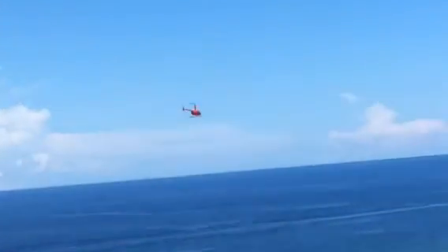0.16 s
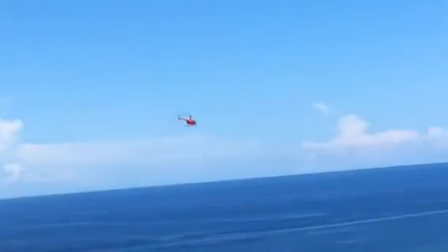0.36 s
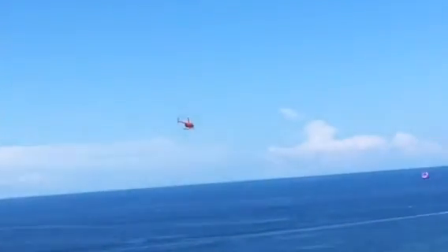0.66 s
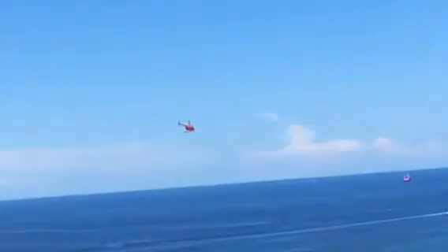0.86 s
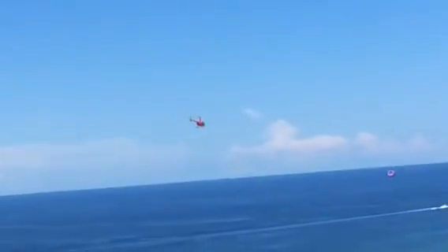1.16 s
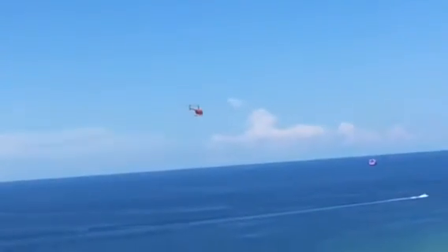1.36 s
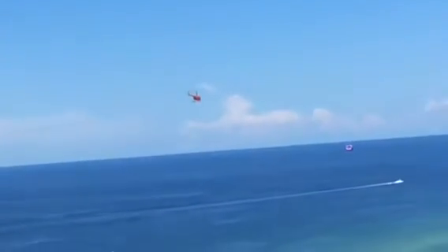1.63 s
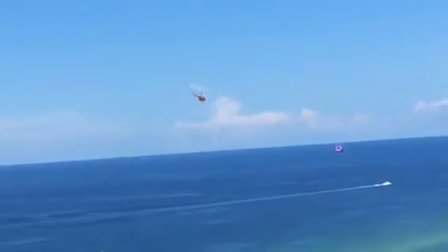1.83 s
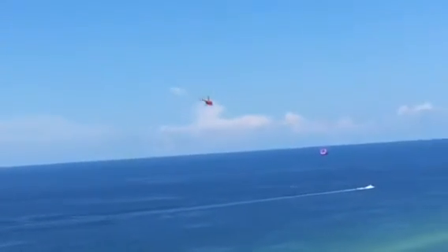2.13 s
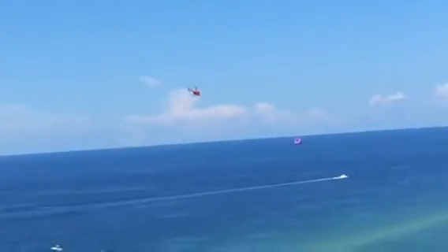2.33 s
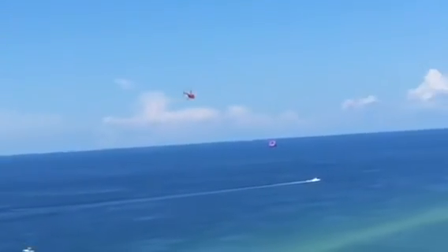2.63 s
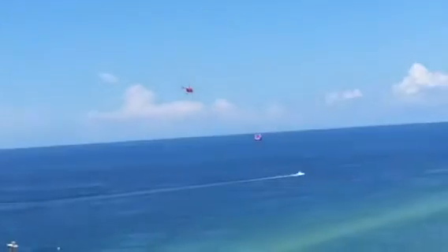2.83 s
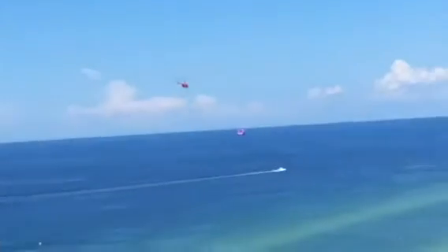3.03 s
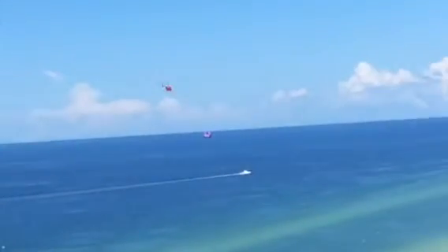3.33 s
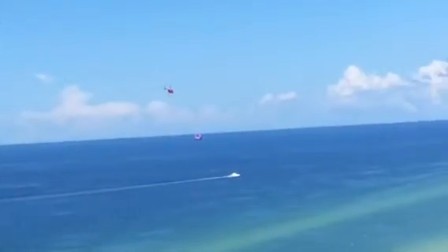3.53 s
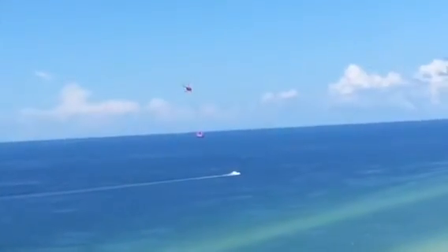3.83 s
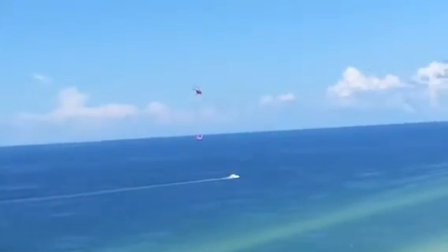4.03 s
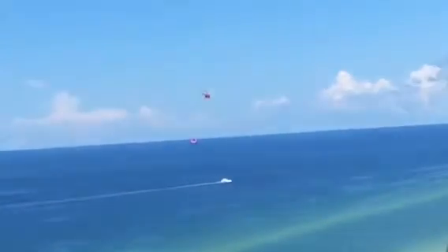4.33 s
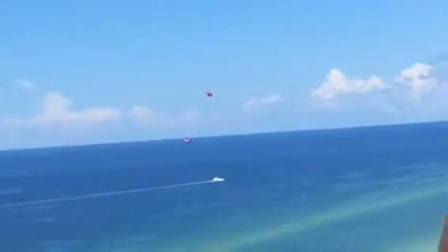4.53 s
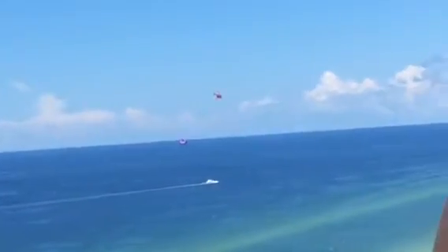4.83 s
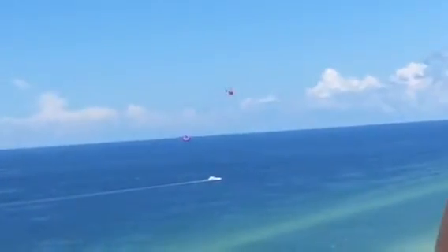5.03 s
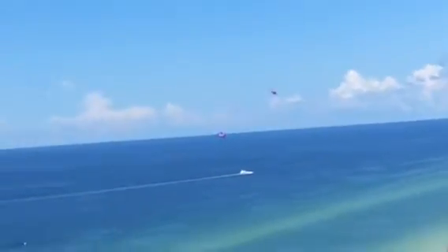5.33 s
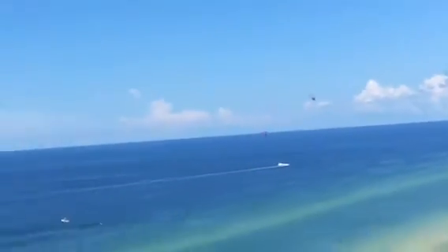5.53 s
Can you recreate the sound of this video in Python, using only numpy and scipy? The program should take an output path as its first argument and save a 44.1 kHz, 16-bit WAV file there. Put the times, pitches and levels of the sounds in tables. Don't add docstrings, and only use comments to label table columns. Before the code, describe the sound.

A distant piston helicopter drones steadily over the sea, slowly wavering and fading, with faint surf hiss and small handling ticks close by.

```python
import sys
import numpy as np
from scipy import signal
from scipy.fft import rfft, irfft, next_fast_len
from scipy.io import wavfile
from scipy.ndimage import uniform_filter1d, map_coordinates

SR = 44100
rng = np.random.default_rng(int(sys.argv[2]) if len(sys.argv) > 2 else 0)


def boost_factor(decibels):
    exponent = np.asarray(decibels, float) / 20
    return 10 ** exponent


def generate_wav(signal):
    frames = np.transpose(np.atleast_2d(signal))
    scaled = np.clip(frames, -1, 1) * 32767
    pcm = np.round(scaled).astype(np.int16)
    wavfile.write(sys.argv[1], SR, pcm)


N = 250480

# (time [s], firing rate as heard [Hz], lag of the sea path [firing periods])
FLIGHT_PATH = [(0, 123.3, 9.12), (.84, 122.87, 8.5), (1.56, 122.5, 8), (2.3, 122.15, 7.5),
               (2.96, 121.85, 7), (3.67, 121.5, 6.5), (4.42, 121.2, 6), (5.31, 120.85, 5.5),
               (5.68, 120.7, 5.32)]
# (time [s], level [dB])
AIR_CLEARNESS = [(0, 0), (.4, 0.1), (.7, 1.5), (1, -0.5), (1.3, 0.5), (1.6, 0), (1.95, 2), (2.3, 0.1),
                 (2.65, 0.7), (3, -0.5), (3.35, 0), (3.75, -2), (4.1, 0.5), (4.5, -0.2), (4.9, 0),
                 (5.3, 0.5), (5.68, 1.5)]
# (time [s], level [dB])
FIRING_SWING = [(0, -32.5), (.9, -31), (1.6, -32.5), (2.6, -33), (3.3, -36.5), (4.1, -38.5), (4.8, -37.5),
                (5.3, -34.5)]
# (time [s], level [dB])
WAVE_WASH = [(0, -61), (.5, -60), (1.3, -61.5), (1.6, -62.5), (2.4, -64.5), (3.35, -65.5), (3.75, -67.5),
             (4.5, -64), (5.25, -62.5), (5.68, -64)]

LOW_ORDERS = (3, 9, 10, 11, 13, 14, 15, 16, 17, 18, 19, 20)
HIGH_ORDERS = (21, 23, 24, 25, 26, 27, 28, 29, 30, 32, 34, 40)
# (level [dB], sea path re straight path [dB], extra lag of its source [firing periods])
LOW_ORDER_LEVELS = [(-13, -4.5, -0.43), (-12, -0.5, 0.023), (-12, -4.5, .07), (-17, 3.5, 0), (-17, -7, 0),
                    (-9, 0, 0.017), (-8.5, -5, 0.074), (-20.5, -1, .07), (-16.5, -14, .07),
                    (-10.5, -2.5, 0.081), (-13, -1, 0.07), (-10.5, -1, 0.091)]
# (level [dB], sea path re straight path [dB])
HIGH_ORDER_LEVELS = [(-40, -5), (-23, -16), (-22, -5), (-20, -17), (-19, -19), (-19.5, -5.5), (-20.5, -5),
                     (-14, -4.5), (-23, -15), (-17.5, -5), (-19, -11.5), (-24.5, 2)]
BLADE_HARMONICS = (4, 5, 6, 7, 8, 9, 12)
BLADE_LEVELS = [-22.5, -32, -13, -21.5, -15.5, -14, -21.5]

# (frequency [Hz], level [dB])
DOWNWASH_SPECTRUM = [(15, -49), (30, -7), (50, -9), (62, 8), (100, 3.5), (140, 5), (190, 6.5), (260, -50)]
ROAR_SPECTRUM = [(120, -20), (180, -2.5), (250, -0.5), (420, -0.5), (520, -3), (680, -2.5), (820, -7.5),
                 (1150, -7), (1550, -12), (2200, -15.5), (2700, -30), (3800, -53)]
SURF_SPECTRUM = [(1800, -18), (2600, 3.5), (3200, 1), (4000, 0), (5200, -1.5), (6300, -6), (7200, -11),
                 (8050, -9.5), (8400, -55)]
SPRAY_SPECTRUM = [(7700, -62), (8100, 2.5), (8700, 0.5), (9400, 0.5), (10200, -4), (12000, -7.5),
                  (13300, -18), (14200, -27), (15200, -18)]
# (centre [Hz], width [Hz], level [dB])
TAILPIPE_MODES = [(1892, 254, 5), (2115, 300, 4)]

# (time [s], length [s], centre [Hz], width [Hz], level [dB])
RUSTLES = [
    (0.29, 0.14, 5500, 1600, -62.5),
    (0.614, .05, 5100, 870, -61),
    (0.76, 0.15, 900, 170, -48.5),
    (1.94, 0.17, 5000, 900, -67),
    (1.7, 0.34, 816, 28, -54.5),
    (2.5, 0.33, 1160, 180, -56),
    (3.7, .1, 1370, 110, -62),
    (5.56, .06, 4000, 700, -62),
    (5.56, .06, 5100, 700, -68),
    (5.55, 0.038, 1960, 410, -55.5),
]
# (time [s], peak level [dB], knock re snap [dB])
TICKS = [
    (.340, -55, -9),
    (.686, -51, -9),
    (1.41, -52, -12),
    (3.5697, -51, -20),
    (5.1891, -41, 3),
    (5.204, -64, 21),
    (5.631, -56, -9),
]
# (frequency [Hz], level [dB])
SNAP_SPECTRUM = [(5000, -20), (8000, -5), (9500, 0), (11000, -4), (14500, -2), (15400, -40)]
KNOCK_SPECTRUM = [(300, -20), (800, -3), (2200, 0), (4500, -4), (8000, -14), (12000, -40)]

# (level at the start [dB], drift [dB/s])
OCTAVE, LOW, HIGH, ROTOR = (-45.5, -0.54), (-43.5, -0.7), (-39.5, -1.8), (-42, -0.99)
EXHAUST, RASP = (-43.5, -0.87), (-50, -1.7)
AIR_ON_ROAR, AIR_ON_RASP, AIR_ON_HIGH = 0.8, 2.05, 0.39
OCTAVE_FOLLOWS = 0.42
HIGH_LAG = 0.037
MIRROR_LAG, FIRING_LOSS_DB, OCTAVE_LOSS_DB = 7.3, 1.3, 3.5
WALL_S, WALL_BASS_S, WALL_EDGE_S = 5.44, 5.56, 0.02
WALL_FIRING_DB, WALL_LOW_DB, WALL_ROTOR_DB = -27, -2, -10
SPRAY_DB, SPRAY_FOLLOWS, SPRAY_RISE_DB_S = -71.5, 0.8, 0.5


def unit(x):
    return x / np.sqrt(np.mean(x ** 2) + 1e-20)


def curves(rows):
    s, *columns = np.transpose(rows)
    return [np.interp(np.arange(N) / SR, s, column) for column in columns]


def wobble(rate):
    knots = rng.standard_normal(int(N * rate / SR) + 4)
    return map_coordinates(knots, [np.arange(N) * rate / SR])


def filtered(x, response):
    m = next_fast_len(N + SR // 2)
    return irfft(rfft(x, m) * response(np.fft.rfftfreq(m, 1 / SR)), m)[:N]


def shape(points):
    f, db = np.transpose(points)
    return lambda hz: boost_factor(np.interp(np.log(hz + 1), np.log(f + 1), db))


def patchy(depth_db):
    z = signal.stft(rng.standard_normal(N + 512), nperseg=512)[2]
    field = uniform_filter1d(rng.standard_normal(z.shape), size=6, axis=0)
    field = uniform_filter1d(field, size=14, axis=1)
    return signal.istft(z * boost_factor(depth_db * unit(field)), nperseg=512)[1][:N]


def two_paths(cycle, lag, order, sea_db, flutter_db, drift):
    start = rng.uniform(0, 2 * np.pi)

    def path(turns):
        level = boost_factor(flutter_db * wobble(5))
        return level * np.sin(2 * np.pi * order * turns + start + drift * wobble(6))

    return path(cycle) + boost_factor(sea_db) * path(cycle - lag / 6)


def firing_tones(cycle, lag, firing_db, octave_db):
    steep = np.maximum(lag - MIRROR_LAG, 0)
    firing_sea_db = 0.5 - FIRING_LOSS_DB * steep
    octave_sea_db = -1 - OCTAVE_LOSS_DB * steep
    firing = two_paths(cycle, lag, 6, firing_sea_db, flutter_db=0.25, drift=0.03)
    octave = two_paths(cycle, lag, 12, octave_sea_db, flutter_db=0.6, drift=0.1)
    return np.sqrt(2) * (boost_factor(firing_db) * firing + boost_factor(octave_db) * octave)


def uneven_cylinders(cycle, lag, low_db, high_db):
    def stack(orders, levels):
        total = np.zeros(N)
        for order, (db, sea_db, extra) in zip(orders, levels):
            total += boost_factor(db) * two_paths(cycle, lag + extra, order, sea_db, flutter_db=1.1, drift=0.12)
        return total

    low = stack(LOW_ORDERS, LOW_ORDER_LEVELS)
    high = stack(HIGH_ORDERS, [(*row, HIGH_LAG) for row in HIGH_ORDER_LEVELS])
    return np.sqrt(2) * (boost_factor(low_db) * low + boost_factor(high_db) * high)


def main_rotor(cycle, lag, rotor_db):
    geared = 3 / 5
    thump = np.zeros(N)
    for k, db in zip(BLADE_HARMONICS, BLADE_LEVELS):
        thump += boost_factor(db) * two_paths(cycle, lag, k * geared, sea_db=-7.5, flutter_db=1.5, drift=0.3)
    downwash = unit(filtered(rng.standard_normal(N), shape(DOWNWASH_SPECTRUM)))
    return np.sqrt(2) * boost_factor(rotor_db) * thump + boost_factor(rotor_db - 4.5) * downwash


def exhaust(cycle, roar_db, rasp_db):
    def beat(order):
        return np.cos(2 * np.pi * order * cycle)

    def pipe(f):
        return sum(boost_factor(db) * 1j * f * w / (c * c - f * f + 1j * f * w) for c, w, db in TAILPIPE_MODES)

    puffs = boost_factor(0.43 * beat(2) + 0.3 * beat(3) + 0.43 * beat(1))
    roar = unit(filtered(puffs * patchy(0.88), shape(ROAR_SPECTRUM)))
    bank = boost_factor(0.6 * beat(3) + 0.8 * beat(2) + 2.5 * beat(6) + 1.3 * wobble(12))
    rasp = unit(filtered(bank * patchy(1.6), lambda f: pipe(f) ** 2))
    return boost_factor(roar_db + 0.5) * roar + boost_factor(rasp_db - 1.1) * rasp


def shore(surf_db, spray_db):
    breeze_db = 0.5 * wobble(11) + 0.41 * wobble(40)
    surf = unit(filtered(patchy(0.99), shape(SURF_SPECTRUM)))
    spray = unit(filtered(patchy(0.7), shape(SPRAY_SPECTRUM)))
    return boost_factor(breeze_db) * (boost_factor(surf_db + 3.0) * surf + boost_factor(spray_db + 1.2) * spray)


def rustles():
    t = np.arange(N) / SR
    total = np.zeros(N)
    for s, length, hz, width_hz, db in RUSTLES:
        band = filtered(rng.standard_normal(N), lambda f: np.exp(-((f - hz) / width_hz) ** 2))
        total += boost_factor(db) * np.exp(-((t - s) / length) ** 2) * unit(band)
    return total


def ticks():
    snaps, knocks = np.zeros(N), np.zeros(N + SR)
    t = np.arange(SR // 50) / SR
    for s, db, body_db in TICKS:
        start = round(s * SR)
        snaps[start] = boost_factor(db + 12)
        decay = boost_factor(db + body_db + 6 - 60 * t / 0.005)
        knocks[start:start + len(t)] += decay * np.cos(2 * np.pi * 2100 * t)
    return filtered(snaps, shape(SNAP_SPECTRUM)) - filtered(knocks[:N], shape(KNOCK_SPECTRUM))


def scene():
    t = np.arange(N) / SR
    firing_hz, lag = curves(FLIGHT_PATH)
    (air_db,), (waves_db,), (firing_db,) = curves(AIR_CLEARNESS), curves(WAVE_WASH), curves(FIRING_SWING)
    cycle = np.cumsum(firing_hz / 6) / SR

    def fade(layer):
        return layer[0] + layer[1] * t

    def behind_wall(s):
        return (1 + np.tanh((t - s) / WALL_EDGE_S)) / 2

    hidden, deep = behind_wall(WALL_S), behind_wall(WALL_BASS_S)
    octave_db = fade(OCTAVE) + OCTAVE_FOLLOWS * (firing_db - firing_db.max())
    low_db = fade(LOW) + WALL_LOW_DB * deep
    high_db = fade(HIGH) + AIR_ON_HIGH * air_db
    spray_db = SPRAY_DB + SPRAY_RISE_DB_S * (t - t.mean()) + SPRAY_FOLLOWS * (waves_db - waves_db.mean())

    mix = firing_tones(cycle, lag, firing_db + WALL_FIRING_DB * hidden, octave_db)
    mix += uneven_cylinders(cycle, lag, low_db, high_db)
    mix += main_rotor(cycle, lag, fade(ROTOR) + WALL_ROTOR_DB * deep)
    mix += exhaust(cycle, fade(EXHAUST) + AIR_ON_ROAR * air_db, fade(RASP) + AIR_ON_RASP * air_db)
    mix += shore(waves_db, spray_db)
    mix += rustles()
    mix += ticks()
    return mix[None]


def top_cut(x):
    return signal.sosfilt(signal.butter(12, 15290, fs=SR, output="sos"), x)


def record(dry):
    return top_cut(dry)


dry = scene()
out = record(dry)
generate_wav(out)
```